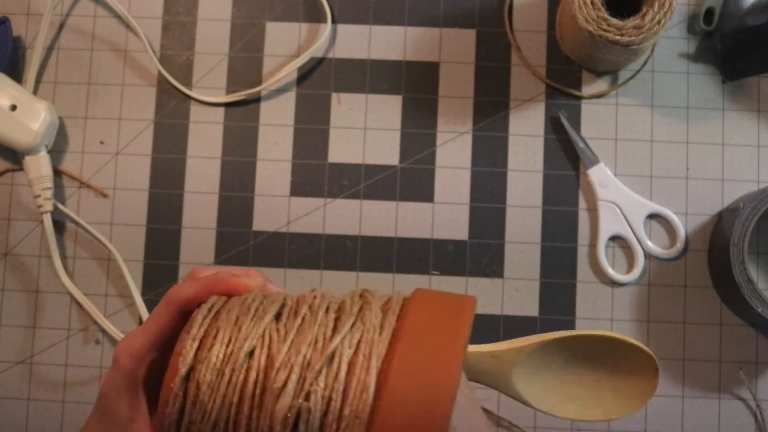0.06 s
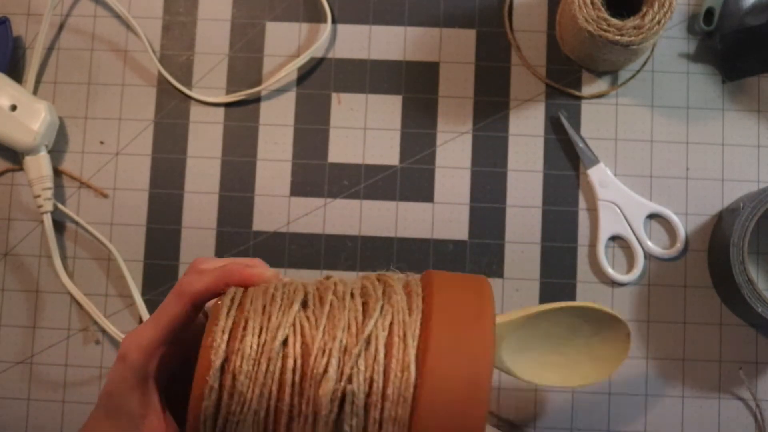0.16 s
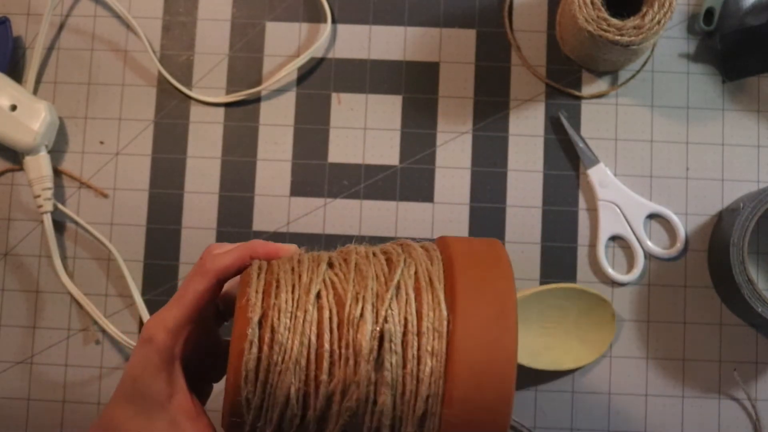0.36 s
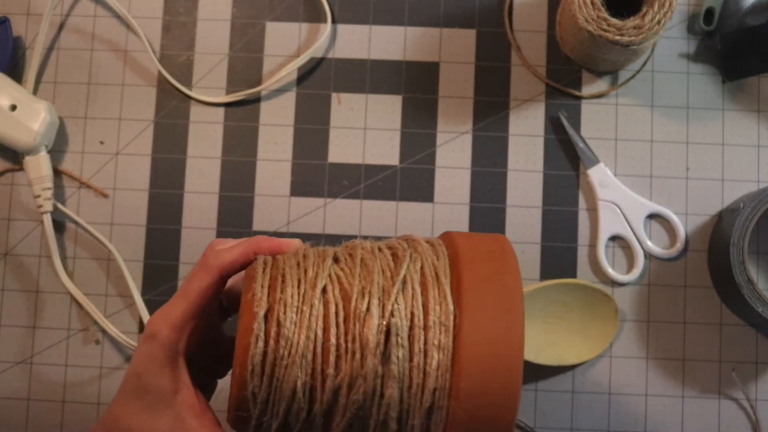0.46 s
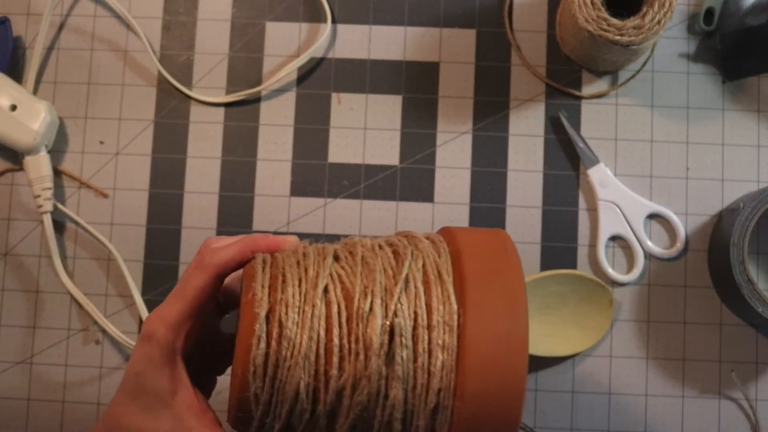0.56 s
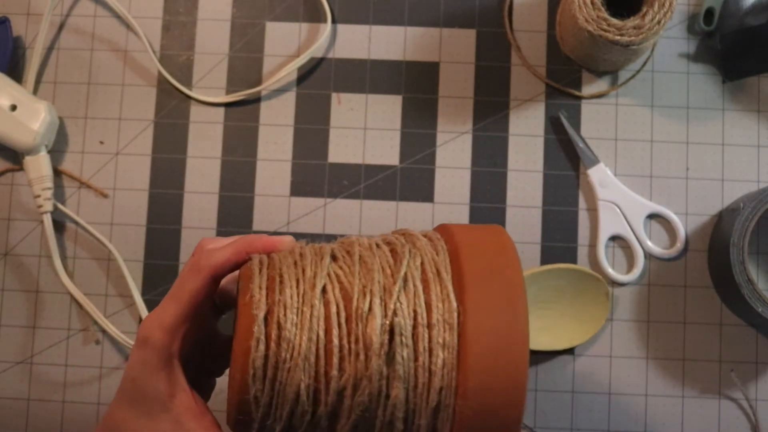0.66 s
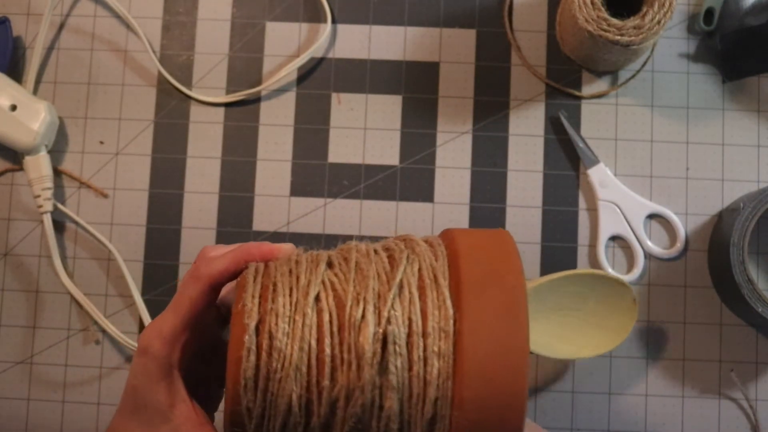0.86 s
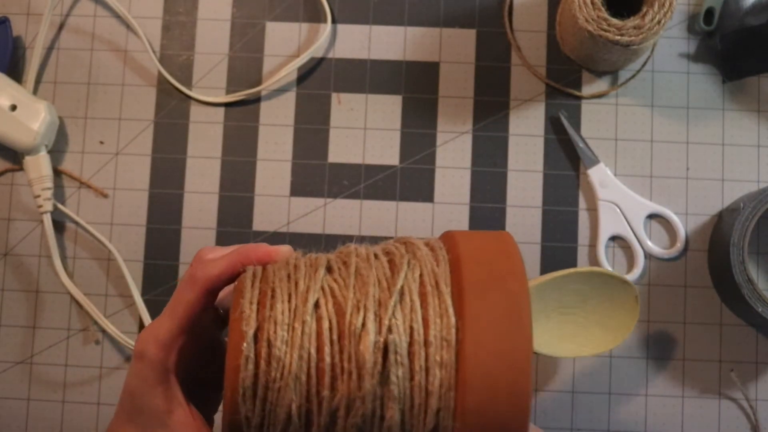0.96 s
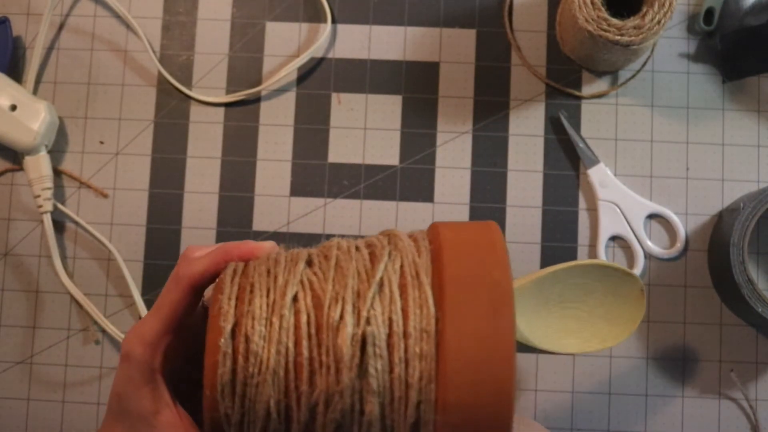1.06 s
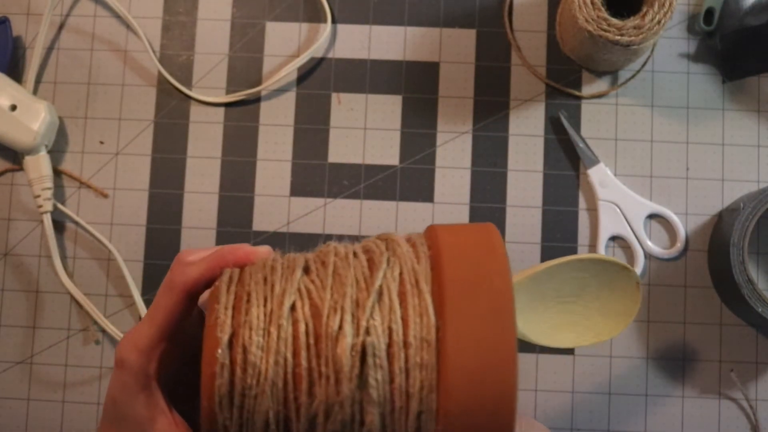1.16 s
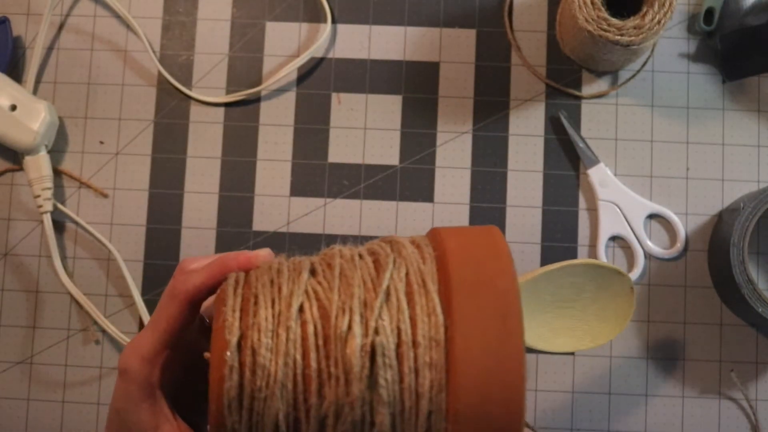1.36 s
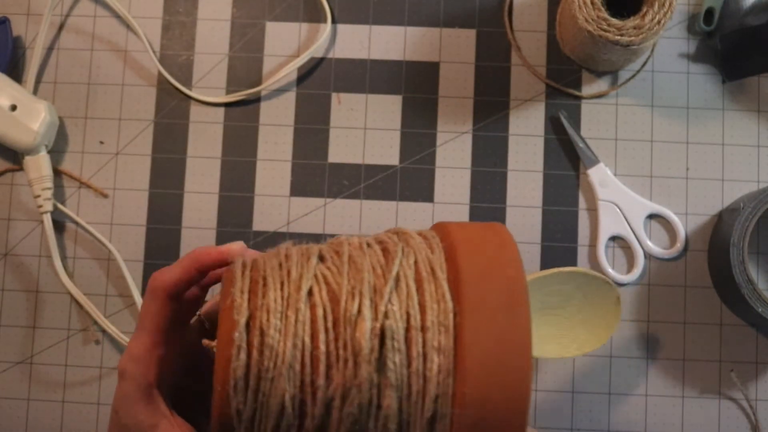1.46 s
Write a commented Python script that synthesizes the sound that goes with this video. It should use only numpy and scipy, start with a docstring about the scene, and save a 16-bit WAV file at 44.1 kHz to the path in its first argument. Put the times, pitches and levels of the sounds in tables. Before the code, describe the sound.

Close up in a small room, a clay pot with a wooden spoon inside gives two quick, sharp knocks over dull table thuds. The pot then shifts with a light scrape and tiny clinks against quiet room noise.

```python
"""A clay pot knocks on a table

A twine-wrapped clay pot with a wooden spoon in it knocks twice on a table, close by in a small room.
The damped clay gives a short crack, the table thuds and longer tones linger in the room after each knock.
Then the pot scuffs, with a thin squeak, and something hard clinks faintly.
Under it all lie room noise and a low hum that swells near the end."""
import sys
import numpy as np
from scipy import signal
from scipy.fft import rfft, irfft
from scipy.io import wavfile

SR = 44100
rng = np.random.default_rng(int(sys.argv[2]) if len(sys.argv) > 2 else 0)


def generate_wav(signal):
    """Clip the signal to [-1, 1] and save it as 16-bit WAV at the path in sys.argv[1]."""
    frames = np.transpose(np.atleast_2d(signal))
    scaled = np.clip(frames, -1, 1) * 32767
    pcm = np.round(scaled).astype(np.int16)
    wavfile.write(sys.argv[1], SR, pcm)


N = 66150
T = np.arange(N) / SR
FREQ = np.fft.rfftfreq(N, 1 / SR)
LOW_PAN_DB = -4.5  # the thuds and the low hum sit to the right


def pot_knocks():
    """Each knock cracks and rings the clay; longer tones linger. Gives the sound and the room's share."""
    # Each row: start in seconds, level in dB, pitch factor, ring length factor,
    # then the crack, the lingering tones and the room's share in dB.
    knocks = [(0.2377, 1, 1.005, 1, -2.5, -4, -3.5), (0.3134, -4.5, .993, 1.36, 0.5, 1.5, -1.5)]
    # Tones of the pot and spoon. Each row: pitch in Hz, level in dB, ring time in seconds,
    # left minus right in dB.
    clay_tones = [(554, -26.5, 0.13, 2), (688.5, -16, 0.051, 4), (758, -20, 0.046, -3),
                  (1057, -33, 0.043, -1), (1124, -24.5, 0.06, 4), (2096, -8.5, .023, -3.5),
                  (2185, -7.5, 0.021, -5.5), (2312, -18, 0.035, -8.5), (2860, -25, 0.028, 3),
                  (3190, -25, 0.027, 5), (4148, -7.5, 0.012, 3), (4326, -11.5, 0.01, 0),
                  (4810, -10.5, 0.0072, 12)]
    # Longer tones that linger in the room. Each row: pitch in Hz, level in dB, ring time in seconds.
    lingering_tones = [(181.4, -30, 0.18), (261.2, -20.5, 0.38), (281.2, -24.5, 0.25), (506.6, -40, 0.9),
                       (589, -40, 0.52), (637, -37, 0.12), (1022, -37.5, 0.39), (1159, -36, .28),
                       (2000, -37, 0.11), (2300, -45, 0.15), (2172, -43, 0.12), (2390, -31, 0.11)]
    # Tone colour of the crack. Each row: frequency in Hz, level in dB.
    crack_colour = [(120, -4), (380, -12), (1500, -26), (2000, -14), (2900, 10), (3550, -3.5), (4100, 2),
                    (5000, 3), (5800, -6.5), (8000, -1.5), (10000, -11), (13000, -21), (16000, -38)]
    colour = gain(read_curve(crack_colour, FREQ))
    bass_cut = signal.butter(2, 131, "high", fs=SR, output="sos")  # a small pot gives off little bass
    direct, to_room = 0, 0
    for start, db, pitch, length, crack_db, lingering_db, room_db in knocks:
        age = T - start - np.array([[0], [0.00003]])  # the right side hears it a little later
        clay = sum(gain(level) * pan(side) * ring(age, hz * pitch, ring_s * length, rise_s=1 / hz)
                   for hz, level, ring_s, side in clay_tones)
        crack = gain(crack_db) * pan(2) * noise(colour, likeness=0.035)
        crack *= fade(age, ring_s=0.0072, rise_s=0.00005)
        lingering = sum(gain(level) * ring(T - start, hz, ring_s, rise_s=0.012)
                        for hz, level, ring_s in lingering_tones)
        direct += gain(db) * (signal.sosfilt(bass_cut, clay + crack) + gain(lingering_db) * lingering)
        # The room gets the crack as one sharp click of the same colour.
        click = gain(crack_db + 8) * irfft(colour * np.exp(-2j * np.pi * FREQ * start), N)
        to_room += gain(db + room_db) * signal.sosfilt(bass_cut, clay + click)
    return direct, to_room


def table_thuds(pitch_hz=56):
    """The table top sways for a few cycles after each knock."""
    # Each row: time of the peak in seconds, level in dB, swell time in seconds.
    thuds = [(0.292, -29.5, 0.024), (0.37, -36.5, 0.031)]
    sway = 0
    for peak, db, swell_s in thuds:
        swell = np.exp(-((T - peak) / swell_s) ** 2)
        sway -= gain(db) * swell * np.cos(2 * np.pi * pitch_hz * (T - peak))
    return pan(LOW_PAN_DB) * sway


def pot_scuffs():
    """The pot is shifted and scrapes in short bursts of noise."""
    # Each row: start in seconds, level in dB, rise time and fade time in seconds.
    scuffs = [(0.583, -37, 0.0037, 0.19), (0.662, -41.5, 0.012, 0.16)]
    # Tone colour of a scuff. Each row: frequency in Hz, level in dB.
    colour = [(130, 2), (200, -14), (262, 9.5), (380, -12), (600, 10.5), (950, -7), (1500, -8), (2100, 7.5),
              (2700, -2.5), (3800, 3), (7000, -8.5), (10000, -12.5), (14000, -24), (16000, -40)]
    scrape = normalize(noise(gain(read_curve(colour, FREQ)), likeness=0.57))
    return scrape * sum(gain(db) * fade(T - start, fade_s, rise_s) for start, db, rise_s, fade_s in scuffs)


def faint_clinks():
    """Light touches make something hard ring."""
    # Each row: start in seconds, level in dB.
    touches = [(.553, -49), (.639, -46), (.649, -39.5), (.663, -39), (.6724, -32.5), (.6974, -42.5),
               (1.3514, -51)]
    # Each row: pitch in Hz, level in dB, ring time in seconds.
    tones = [(1655, -8.5, 0.048), (3650, -0.5, 0.052), (4630, -14, .04), (6140, -9.5, 0.048),
             (8130, -17, .03), (10100, -17, 0.028)]
    return sum(gain(db + level) * ring(T - start, hz, ring_s, rise_s=0.0009)
               for start, db in touches for hz, level, ring_s in tones)


def rubbing_squeak(pitch_hz=3580, width_hz=91):
    """Rubbing makes a thin squeak: noise in a narrow band."""
    # Each row: time in seconds, level in dB.
    levels = [(.1, -87), (.17, -64), (.23, -76), (.6, -85), (.66, -57), (.78, -60), (.83, -78.5),
              (.93, -67), (1.05, -90), (1.23, -76), (1.34, -72), (1.37, -58), (1.44, -74)]
    band = 1 / (1 + ((FREQ - pitch_hz) / width_hz) ** 2)
    return normalize(noise(band, likeness=0.17)) * loudness(levels)


def room_echo(sound):
    """The walls reflect the sound in a blur; each frequency band fades at its own speed."""
    # Each row: frequency in Hz, level in dB, fade time in seconds, left-right likeness from 0 to 1.
    bands = [(123, 4.5, 0.46, 0.88), (247, 9, 0.56, 0.55), (387, -10, 0.68, 1), (644, 5.5, 0.38, 0.72),
             (893, -6.5, .33, 0.64), (1060, 6.5, 0.34, 0), (1550, -2, 0.42, 1), (2020, 1.5, 0.36, 0),
             (2690, 2.5, 0.36, 0), (3950, -1, 0.36, .05), (8100, 0, 0.37, 0), (15000, 4, 0.34, 0.11)]
    centres_hz = np.array(bands)[:, 0]
    likeness = read_curve(bands, FREQ, column=3)
    tail = 0
    for share, (_, db, fade_s, _) in zip(np.eye(len(bands)), bands):
        band = np.sqrt(read_curve(np.c_[centres_hz, share], FREQ))
        decay = fade(T - 0.001, fade_s, rise_s=0.0015)
        same_energy = np.sqrt(2 * np.log(1000) / (fade_s * SR))  # for long and short fades alike
        tail += gain(db) * noise(band, likeness) * decay * same_energy
    return pan(0.5) * signal.fftconvolve(sound.mean(0)[None], tail, axes=1)[:, :N]


def room_noise():
    """A soft, nearly steady rush fills the room."""
    # Each row: frequency in Hz, level in dB.
    colour = [(20, -22), (48, 6), (80, -2), (180, -2), (300, 0.5), (600, -2), (1400, -6.5), (2800, -9.5),
              (5600, -13), (10000, -16.5), (14000, -21.5), (16000, -25)]
    # Each row: frequency in Hz, left-right likeness from 0 to 1.
    likeness = [(60, 0.61), (130, 0.27), (290, 0.66), (640, 0.37), (1400, 0.15), (3100, 0)]
    # Each row: time in seconds, added level in dB.
    swell = [(0, 1), (.9, 1), (1.2, 1.5), (1.5, 1.8)]
    rush = normalize(noise(gain(read_curve(colour, FREQ)), read_curve(likeness, FREQ)))
    return gain(-51.5) * rush * loudness(swell)


def low_hum(pitch_hz=61):
    """One deep tone swells near the end."""
    # Each row: time in seconds, level in dB.
    levels = [(0, -64), (.95, -72), (1.2, -58), (1.5, -60)]
    return pan(LOW_PAN_DB) * np.sqrt(2) * np.sin(2 * np.pi * pitch_hz * T) * loudness(levels)


def gain(db):
    """Turn decibels into a multiplier."""
    return 10 ** (np.asarray(db) / 20)


def loudness(levels):
    """A multiplier that glides through rows of seconds and dB."""
    return gain(np.interp(T, *np.array(levels).T))


def read_curve(rows, hz, column=1):
    """Read between a table's rows, with octaves evenly spaced."""
    rows = np.array(rows, float)
    return np.interp(np.log(np.maximum(hz, 1)), np.log(rows[:, 0]), rows[:, column])


def pan(db):
    """Left and right multipliers; positive dB leans left."""
    return gain(np.array([[db], [-db]]) / 2)


def noise(colour, likeness):
    """Coloured stereo noise; at likeness 1 both sides are the same."""
    mid, side = rfft(rng.standard_normal((2, N)))
    shared = mid * np.sqrt(1 + likeness)
    opposite = np.array([[1], [-1]]) * side * np.sqrt(1 - likeness)
    return irfft(colour * (shared + opposite), N) / np.sqrt(2)


def normalize(sound):
    """Scale to an average power of 1."""
    return sound / np.sqrt(np.mean(sound ** 2))


def fade(age, ring_s, rise_s):
    """Rise from age 0, then die away by 60 dB in ring_s seconds."""
    age = np.maximum(age, 0)
    return (1 - np.exp(-age / rise_s)) * np.exp(-np.log(1000) * age / ring_s)


def ring(age, hz, ring_s, rise_s):
    """One tone that rises and fades."""
    return -np.cos(2 * np.pi * hz * age) * fade(age, ring_s, rise_s)


def scene():
    """The pot knocks and shifts in the small room."""
    knocks, to_room = pot_knocks()
    handling = pot_scuffs() + faint_clinks() + rubbing_squeak()
    echo = room_echo(to_room + gain(-4) * handling)
    return knocks + handling + echo + table_thuds() + room_noise() + low_hum()


def record(dry):
    """Clip at full scale and cut the treble above 16000 Hz."""
    treble_cut = signal.ellip(8, 0.2, 70, 16000, fs=SR, output="sos")
    return signal.sosfilt(treble_cut, np.clip(dry, -1, 1))


dry = scene()
out = record(dry)
generate_wav(out)
```